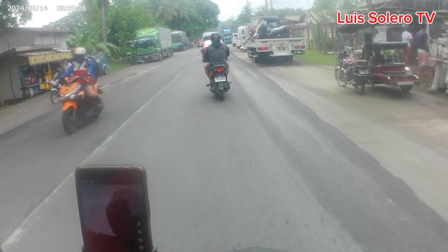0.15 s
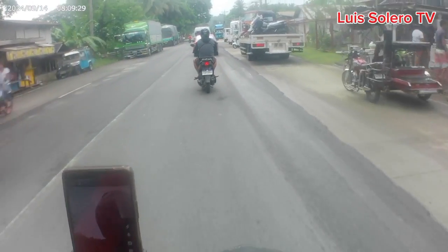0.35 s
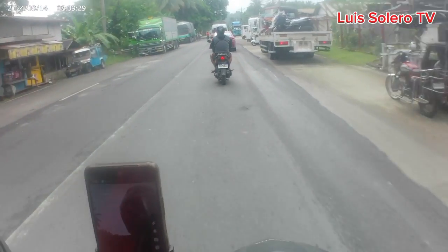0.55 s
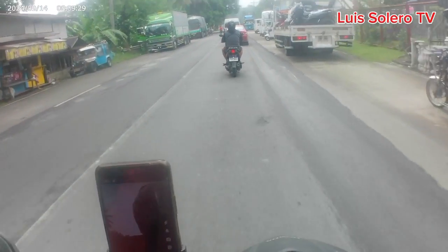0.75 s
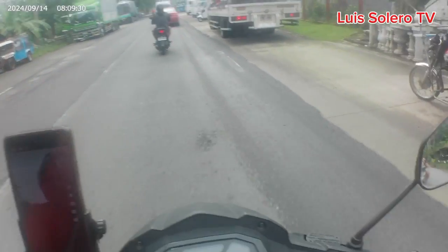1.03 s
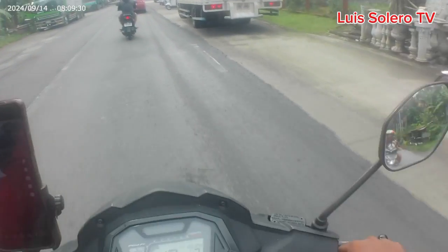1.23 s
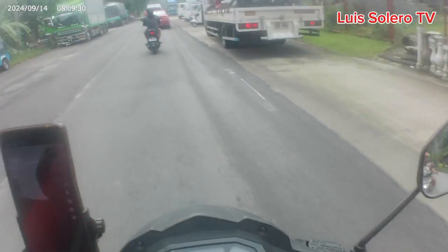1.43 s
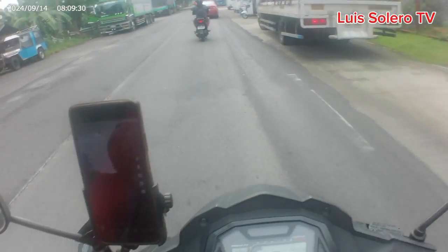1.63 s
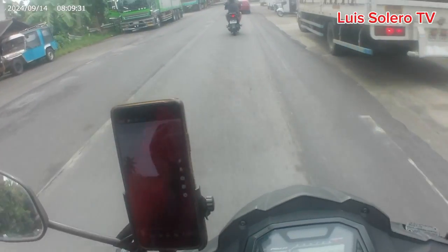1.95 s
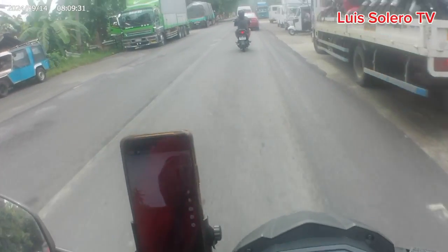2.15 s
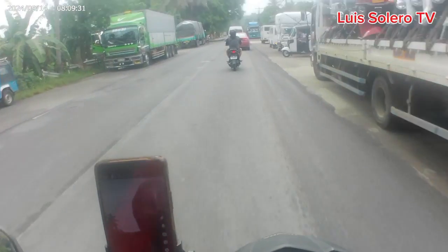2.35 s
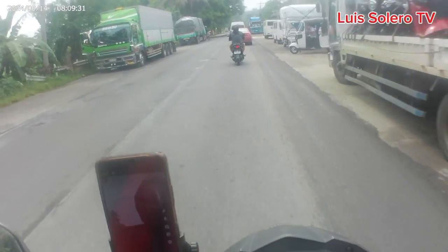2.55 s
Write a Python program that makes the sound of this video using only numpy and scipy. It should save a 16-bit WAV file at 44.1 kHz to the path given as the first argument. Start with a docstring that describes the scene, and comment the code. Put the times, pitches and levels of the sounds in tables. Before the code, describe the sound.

Small motorcycle engine hum with a drive whine and tyre noise, opening with harsh thumps and clicks

```python
"""Motorcycle ride with a jostled camera

A small motorcycle putters along, heard from a camera carried by the rider: sine orders of the firing rate make
the engine; modulated tones and narrow noise its drive; shaped noise the tyres, drone, low rumble and air.
In the first half second the mount rumbles, decaying swings thump, ringing bursts click and band noise rubs,
overloading the mic; the rumble is wind afterwards, and one soft thump follows later.
An oncoming scooter, noise with narrow rings, swells and hisses away behind."""
import sys
import numpy as np
from scipy import signal
from scipy.io import wavfile

SR = 44100
rng = np.random.default_rng(int(sys.argv[2]) if len(sys.argv) > 2 else 0)


def to_wav(sig):
    """Store sig (one row per channel, or 1-D mono) as 16-bit WAV at the path in sys.argv[1].

    Samples outside -1..1 are clipped; the rate is SR.
    """
    pcm = np.clip(np.atleast_2d(sig), -1, 1) * 32767
    pcm = np.round(pcm).astype(np.int16)
    wavfile.write(sys.argv[1], SR, pcm.T)  # frames by channels


N = 119070
TIME = np.arange(N) / SR

# Engine firing rate before jitter: time_s, firing_hz
FIRING_RATE = [(0, 36.11), (.6, 36.5), (.9, 33.47), (1.2, 31.66), (1.6, 32.55), (2.0, 31.14), (2.35, 32.34),
               (2.7, 33.5)]
# Engine loudness over the ride: time_s, level_db
ENGINE_LEVEL_CURVE = [(0, -51), (.8, -51), (1.08, -44), (1.22, -38), (1.45, -39), (1.72, -35.5),
                      (2.0, -42.5), (2.3, -38.5), (2.7, -39.5)]
# Balance of the engine orders before flicker: multiple of the firing rate, relative_db
ENGINE_ORDERS = [(1, 1), (2, -12.5), (3, -9), (4, -2.5), (5, -10.5), (7, -18), (8, -12.5), (9, -17),
                 (10, -10.5), (11, -16.5), (15, -19)]
SPEED_JITTER, ORDER_FLICKER_DB = 0.0114, 0.5  # jitter is a fraction of the firing rate

# Main whine of the drive: time_s, pitch_hz, level_db before the throb
WHINE_CURVE = [(0, 1335, -43), (.6, 1320, -48.5), (.95, 1335, -50.5), (1.6, 1330, -51.5),
               (2.05, 1320, -49.5), (2.29, 1345, -43), (2.46, 1385, -44.5), (2.57, 1345, -48.5),
               (2.7, 1330, -49)]
# Higher resonances of the whirring drive: pitch_hz, width_hz, relative_db
DRIVE_RINGS = [(1896, 225, -53), (3510, 81, -67.5), (4366, 530, -61.5)]
# Fader on those resonances: time_s, gain_db
WHIRR_GAIN_CURVE = [(0, 2.5), (.6, 1.5), (.95, -2), (1.5, -0.5), (2.1, 0), (2.4, 0.5), (2.7, 4.5)]
WHINE_WANDER_HZ, WHINE_CLEAN = 62, 0.46  # rate of the rough part; steady tone against it
FIRING_THROB = 0.19  # swing of the drive's gain with each firing

# Tyre noise loudness: time_s, level_db
TYRE_LEVEL_CURVE = [(0, -45.5), (.55, -45.5), (.85, -54.5), (1.15, -48), (1.55, -45.5), (1.9, -46),
                    (2.2, -46), (2.5, -44), (2.7, -44.5)]
# Tyre noise colour: frequency_hz, relative_db_per_hz
TYRE_SPECTRUM = [(60, -12), (200, -8.5), (420, -12.5), (620, -8.5), (950, -14.5), (1250, -7), (1550, -13),
                 (2000, -9), (2600, -17), (2950, -27.5), (5000, -46), (16000, -72)]
# Loudness of the low rumble, the mount shaking in the first half second, wind afterwards: time_s, level_db
RUMBLE_LEVEL_CURVE = [(0, -34.5), (.45, -17), (.6, -38.5), (.75, -33.5), (.82, -38.5), (1.03, -32),
                      (1.15, -40.5), (1.65, -46.5), (1.8, -33.5), (1.92, -32), (2.03, -38), (2.25, -36.5),
                      (2.45, -36), (2.7, -34)]
# Colour of the low rumble: frequency_hz, relative_db_per_hz
RUMBLE_SPECTRUM = [(15, -8.5), (36, 3.5), (60, -7), (100, -10.5), (170, -19), (400, -38), (2000, -82)]
# Low drone of the bodywork: frequency_hz, relative_db_per_hz
DRONE_SPECTRUM = [(40, -4), (90, 1), (150, 4), (205, -11.5), (255, -1), (330, 3.5), (410, -16),
                  (600, -21.5), (1200, -39)]
# Steady hiss of the air: frequency_hz, relative_db_per_hz
AIR_SPECTRUM = [(1000, 7.5), (3000, 6.5), (4000, -1), (4800, 3), (5600, -4.5), (7000, -10.5),
                (10000, -24.5), (16000, -20)]
DRONE_DB, AIR_DB = -46.5, -58.5

# Rubs on the housing: start_s, length_s, level_db before the fades, low_edge_hz, high_edge_hz
RUB_EVENTS = [(.0, 0.051, -44.5, 3100, 6550), (0.106, 0.022, -28, 120, 500), (0.229, 0.037, -24, 81, 690),
              (0.314, .06, -32, 3270, 4960), (.359, 0.055, -18, 895, 1444), (.36, 0.079, -38, 3300, 4350),
              (0.397, 0.095, -18, 222, 383)]
RUB_GRAIN_DB, RUB_ATTACK_S = 4.5, 0.0063

# Fader on the passing scooter: time_s, gain_db
SCOOTER_GAIN_CURVE = [(0, -67), (.3, -46), (.5, -44.5), (.62, -50), (.8, -53.5), (1.1, -55.5), (1.6, -74),
                      (2.7, -82)]
# Scooter hiss colour: frequency_hz, relative_db_per_hz
SCOOTER_SPECTRUM = [(300, -14), (900, -2.5), (1400, 14), (2200, 8.5), (2800, -14), (4600, -7), (5800, -20),
                    (7500, -20), (16000, -45)]
# Resonances of the scooter's drive: pitch_hz, width_hz, relative_db
SCOOTER_DRIVE_RINGS = [(2200, 190, -7.5), (4650, 470, -19.5), (5430, 320, -22)]

# Thumps of the mount: start_s, level_db before the rise, pitch_hz, t60_s, rise_s
THUMP_EVENTS = [(.004, -11.5, 31.2, 0.67, 0.0027), (0.124, 0.5, 32.8, 0.18, 0.0035),
                (0.139, -10, 45.6, 0.054, 0.0053), (.152, 4.5, 64, 0.036, 0.0024),
                (.194, 9, 78.5, 0.014, 0.00041), (0.199, -7.5, 29, 0.21, .006),
                (.300, -2, 31.04, 0.66, 0.0083), (.324, 1, 58, 0.12, 0.00069), (0.363, 5, 60, 0.04, 0.0059),
                (0.4, -5.5, 150.2, 0.12, 0.0041), (0.4268, 4, 89.7, 0.18, 0.00073),
                (.434, -3, 221, 0.082, 0.0046), (.451, -6, 96, 0.1, 0.0024),
                (0.473, -10.5, 39.4, 0.5, 0.0031), (1.763, -25.5, 41.2, 0.27, .01)]
OVERTONE_RATIO, OVERTONE_DB = 3.4, -20

# Clicks of the housing: start_s, force_db, brightness_hz, crunch_t60_s, dry_crack_db, boosted_ring_hz
CLICK_EVENTS = [(0.1262, -27, 3520, 0.019, -37, 4200), (0.152, -23.5, 6000, 0.0035, -26.5, 1310),
                (0.1943, -8.5, 4450, 0.0087, -13.5, 1727), (0.2212, -31, 3500, 0.005, -60, 3900),
                (0.2324, -18.5, 2800, 0.011, -61, 1430), (0.239, -20.5, 3720, 0.0067, -54, 3900),
                (0.2474, -21.5, 2800, .012, -58, 1450), (0.3137, -25.5, 5000, 0.017, -52, 3800),
                (0.325, -15, 3500, 0.02, -35, 3100), (.3338, -4, 5900, 0.013, -7.5, 3140),
                (0.3383, -16, 2200, 0.032, -41, 1364), (0.3472, -16.5, 3000, 0.015, -34, 1300),
                (0.4239, -8, 875, 0.023, -28.5, 790), (0.4365, -22, 500, 0.033, -48, 700),
                (0.4428, -18, 900, 0.0063, -41, 1380)]
# Modes of the housing: pitch_hz, width_hz, relative_db
HOUSING_MODES = [(490, 210, -1.5), (820, 284, -1), (1326, 233, 2), (1740, 180, 1), (2177, 133, 5.5),
                 (2985, 380, -4.5), (3900, 570, -2), (5650, 690, -6), (6300, 940, -10), (10600, 1300, -25)]
FIRST_TOUCH = 5.7  # height of the first touch against the crunch
RING_DB, MODE_SCATTER_DB = 12.5, 1
SPOT_DB, SPOT_WIDTH_HZ = 3.5, 208  # extra ring of the spot that is hit
CRACK_T60_S, CRACK_TOP_HZ = 0.0088, 9700

OVERLOAD, CUTOFF_HZ = 1.0, 16300  # clipping amplitude; top of the sound


def from_db(db):
    """Decibels to gain."""
    return 10 ** (np.asarray(db) / 20)


def rms_one(x):
    """Scale to rms 1."""
    return x / np.sqrt(np.mean(x ** 2) + 1e-20)


def in_time(rows):
    """Each column of a curve at every sample."""
    s, *columns = np.transpose(rows)
    return [np.interp(TIME, s, column) for column in columns]


def fader(rows):
    """A curve in decibels as gain at every sample."""
    return from_db(in_time(rows)[0])


def drift(rate_hz):
    """Random wander of spread 1: noise through two equal smoothers, drawn every 40 samples."""
    r = np.exp(-80 * np.pi * rate_hz / SR)
    noise = rng.standard_normal(N // 40 + 2002)
    slow = signal.lfilter([1], [1, -2 * r, r * r], noise)[2000:]  # skip the settling
    return np.interp(np.arange(N) / 40, np.arange(len(slow)), rms_one(slow))


def low_pass(x, hz):
    """Second-order low-pass."""
    sos = signal.butter(2, min(hz, SR * .45), fs=SR, output="sos")
    return signal.sosfilt(sos, x + 1e-18)


def band_pass(x, low_hz, high_hz):
    """Keep what lies between two edges."""
    sos = signal.butter(3, [low_hz, high_hz], "band", fs=SR, output="sos")
    return signal.sosfilt(sos, x)


def resonate(x, hz, width_hz):
    """A resonance with gain 1 on top."""
    r = np.exp(-np.pi * width_hz / SR)
    feed = np.array([1, 0, -1]) * (1 - r * r) / 2
    return signal.lfilter(feed, [1, -2 * r * np.cos(2 * np.pi * hz / SR), r * r], x + 1e-18)


def narrow_noise(hz, width_hz):
    """Noise through two equal resonances, each wider than the result; rms 1."""
    each_hz = width_hz * np.pi / 2
    return rms_one(resonate(resonate(rng.standard_normal(N), hz, each_hz), hz, each_hz))


def ringing_noise(rings):
    """A sum of narrow noises, each at its own level."""
    return sum(from_db(db) * narrow_noise(hz, width_hz) for hz, width_hz, db in rings)


def banded_noise(spectrum, patchy_db):
    """Third-octave bands of noise, each with its own level and flicker; rms 1."""
    edges = 16 * 2 ** (np.arange(31) / 3)
    points, levels = np.transpose(spectrum)
    white = rng.standard_normal((2, N + SR // 2))  # neighbouring bands use separate noise
    out = 0
    for k, (low, high) in enumerate(zip(edges, edges[1:])):
        band = band_pass(white[k % 2], low, high)[-N:]
        level_db = np.interp(np.log(low * high) / 2, np.log(points), levels)
        out = out + band * from_db(level_db + patchy_db * drift(8.5))
    return rms_one(out)


def engine(turn):
    """The exhaust note: whole multiples of the firing rate, each a little unsteady."""
    orders = 0
    for k, db in ENGINE_ORDERS:
        gain = from_db(db + ORDER_FLICKER_DB * drift(3.2))
        orders = orders + gain * np.sin(round(k) * turn + rng.uniform(0, 2 * np.pi))
    return fader(ENGINE_LEVEL_CURVE) * rms_one(orders)


def drive(turn):
    """A rough whine and higher resonances that throb with the firings."""
    hz, db = in_time(WHINE_CURVE)
    phase = 2 * np.pi * np.cumsum(hz) / SR
    # random wander on both quadratures roughens a steady tone
    tone = (WHINE_CLEAN + drift(WHINE_WANDER_HZ)) * np.cos(phase)
    rough = drift(WHINE_WANDER_HZ) * np.sin(phase)
    whine = from_db(db) * rms_one(tone + rough)
    whirr = fader(WHIRR_GAIN_CURVE) * ringing_noise(DRIVE_RINGS)
    return (whine + whirr) * (1 + FIRING_THROB * np.cos(turn))


def tyres():
    """Tyres on the road: patchy broadband noise."""
    return fader(TYRE_LEVEL_CURVE) * banded_noise(TYRE_SPECTRUM, patchy_db=1.57)


def low_rumble():
    """Low noise that rises and falls: the mount shaking in the first half second, wind afterwards."""
    return fader(RUMBLE_LEVEL_CURVE) * banded_noise(RUMBLE_SPECTRUM, patchy_db=2.0)


def bodywork_drone():
    """Low drone of the running machine's bodywork: patchy low noise."""
    return from_db(DRONE_DB) * banded_noise(DRONE_SPECTRUM, patchy_db=3.9)


def air_hiss():
    """Air hiss: noise at one overall level with slight flicker."""
    return from_db(AIR_DB) * banded_noise(AIR_SPECTRUM, patchy_db=1.3)


def rubs():
    """Short grainy slides on the housing; each starts quickly and fades."""
    out = np.zeros(N)
    for s, length, db, low_hz, high_hz in RUB_EVENTS:
        attack = np.clip((TIME - s) / RUB_ATTACK_S, 0, 1)
        fade = np.clip(1 - (TIME - s) / length, 0, 1)
        grains = rng.standard_normal(N) * from_db(RUB_GRAIN_DB * drift(150))
        out += attack * fade * from_db(db) * rms_one(band_pass(grains, low_hz, high_hz))
    return out


def scooter():
    """An oncoming scooter's hiss and ringing drive swell as it passes, then fade behind."""
    rings = ringing_noise(SCOOTER_DRIVE_RINGS)
    hiss = banded_noise(SCOOTER_SPECTRUM, patchy_db=3.5)
    return fader(SCOOTER_GAIN_CURVE) * (hiss + rings)


def thumps():
    """Each jolt sets the mount swinging at a low pitch with one weak overtone."""
    out = np.zeros(N)
    for s, db, hz, t60, rise in THUMP_EVENTS:
        age = np.maximum(TIME - s, 0)
        swing = np.sin(2 * np.pi * hz * age)
        swing += from_db(OVERTONE_DB) * np.sin(2 * np.pi * hz * OVERTONE_RATIO * age)
        decay = from_db(db - 60 * np.minimum(age / t60, 3))
        out -= swing * decay * (1 - np.exp(-age / rise))
    return out


def housing_ring(force):
    """The force excites every housing mode, with alternating sign and scattered level."""
    ringing = 0
    for k, (hz, width_hz, mode_db) in enumerate(HOUSING_MODES):
        gain = from_db(mode_db + RING_DB + MODE_SCATTER_DB * rng.normal())
        ringing = ringing + (-1) ** k * gain * resonate(force, hz, width_hz)
    return ringing


def clicks():
    """A dry crack, a touch and a short crunch; the housing rings, with extra near the pitch of the spot hit."""
    out, age = np.zeros(N), np.arange(SR // 8) / SR
    for s, db, bright_hz, t60, crack_db, spot_hz in CLICK_EVENTS:
        crunch = rng.choice([-1, 1], len(age)) * from_db(-60 * age / t60)
        touch = FIRST_TOUCH * (age == 0)
        ringing = housing_ring(low_pass(from_db(db) * (crunch + touch), bright_hz))
        spot = from_db(SPOT_DB) * resonate(ringing, spot_hz, SPOT_WIDTH_HZ)
        crack = rng.choice([-1, 1], len(age)) * from_db(crack_db - 60 * age / CRACK_T60_S)
        start = int(s * SR)
        out[start:start + len(age)] += ringing + spot + low_pass(crack, CRACK_TOP_HZ)
    return out


def scene():
    """The ride, with the jostled camera on top; engine and drive share one firing phase."""
    firing_hz = in_time(FIRING_RATE)[0] * (1 + SPEED_JITTER * drift(6.16))
    turn = 2 * np.pi * np.cumsum(firing_hz) / SR
    ride = engine(turn) + drive(turn) + tyres() + low_rumble() + bodywork_drone() + air_hiss()
    passing = scooter()
    jostling = thumps() + clicks() + rubs()
    return (ride + passing + jostling)[None]


def record(dry):
    """The hardest knocks overload the input; the top is cut."""
    clipped = np.clip(dry, -OVERLOAD, OVERLOAD)
    sos = signal.cheby2(14, 60, CUTOFF_HZ + 500, fs=SR, output="sos")
    return signal.sosfilt(sos, clipped)


dry = scene()
out = record(dry)
to_wav(out)
```